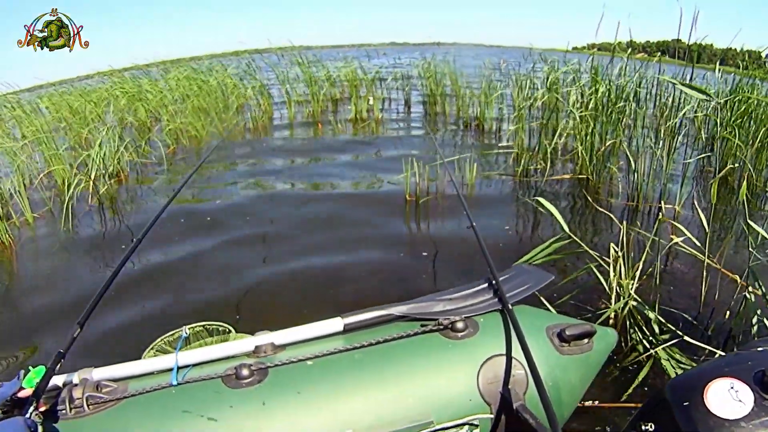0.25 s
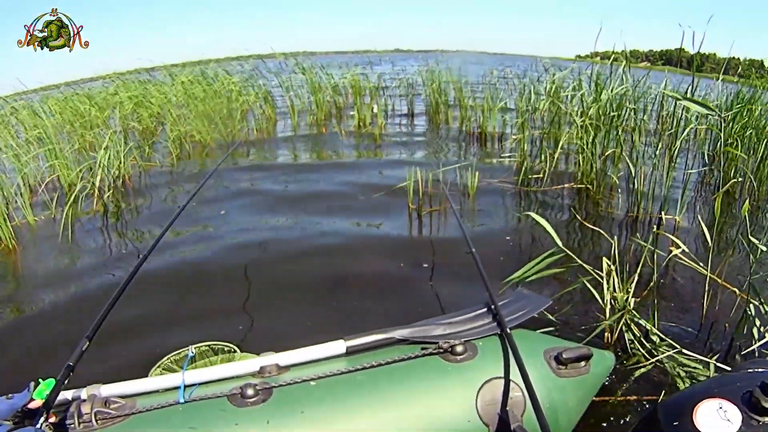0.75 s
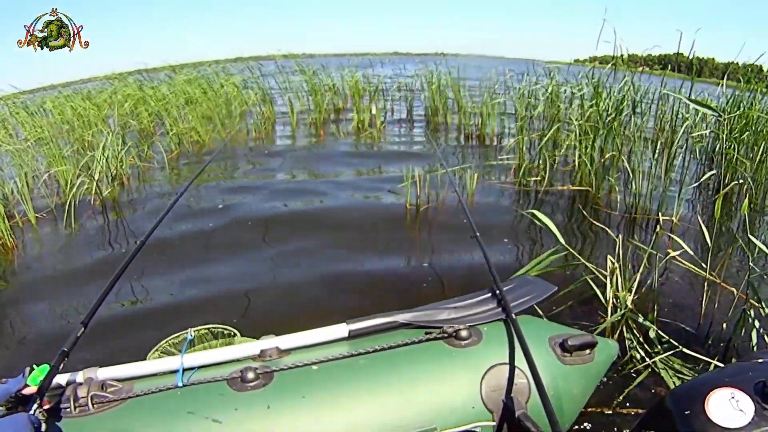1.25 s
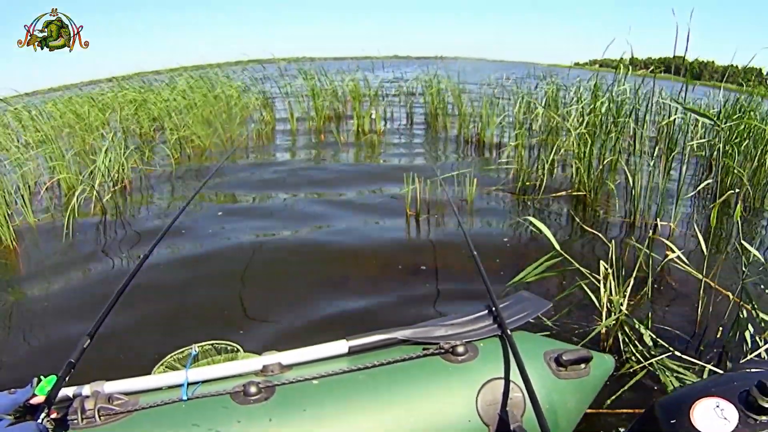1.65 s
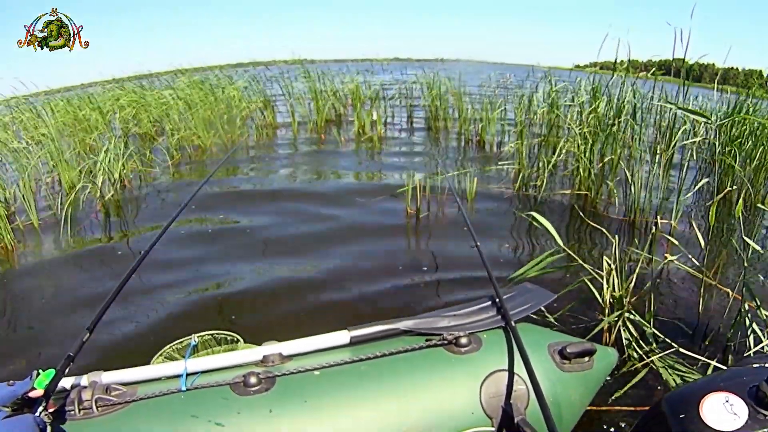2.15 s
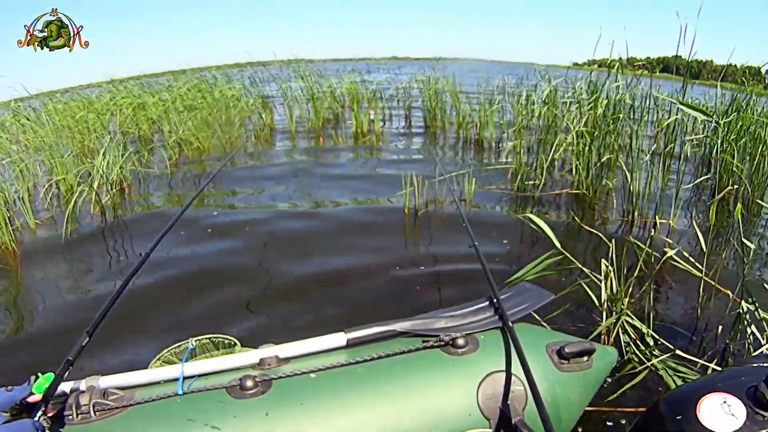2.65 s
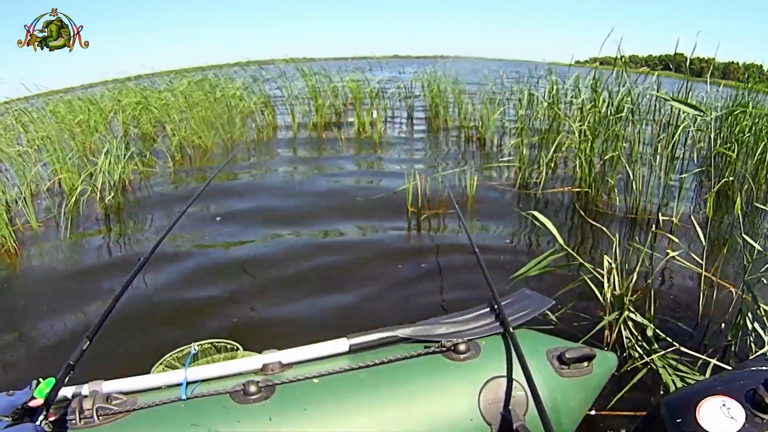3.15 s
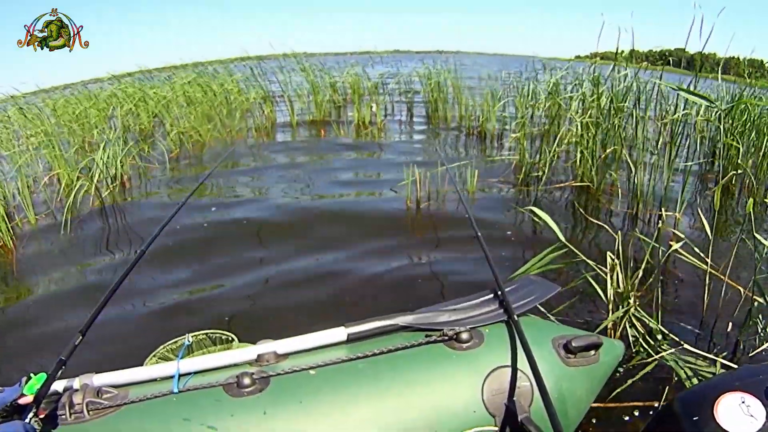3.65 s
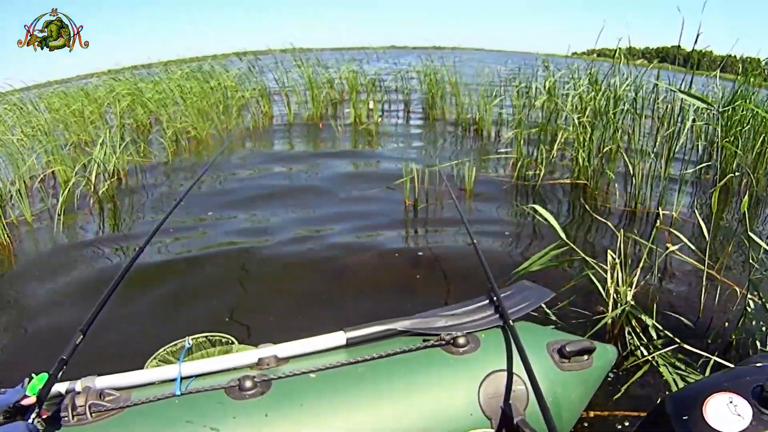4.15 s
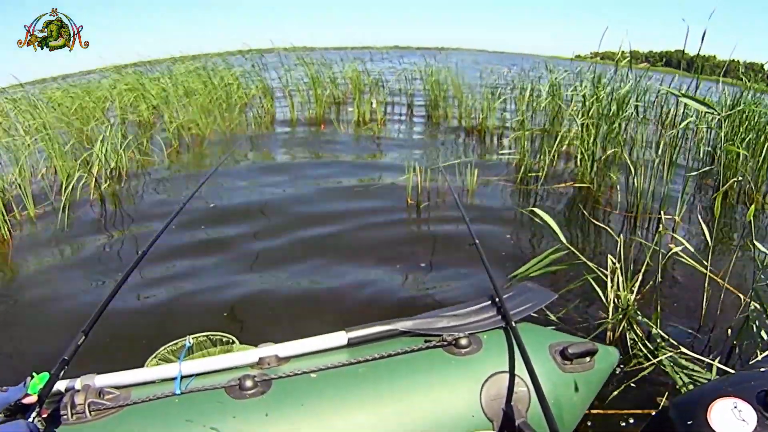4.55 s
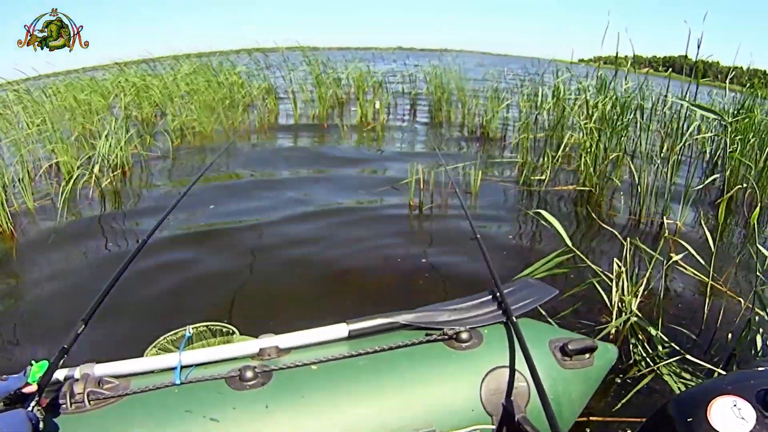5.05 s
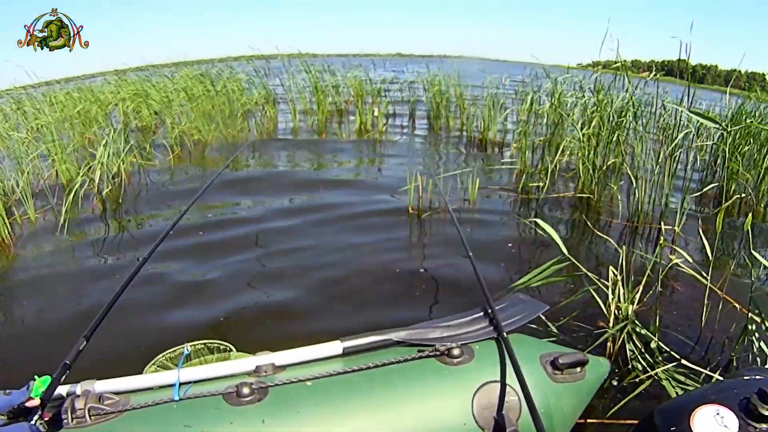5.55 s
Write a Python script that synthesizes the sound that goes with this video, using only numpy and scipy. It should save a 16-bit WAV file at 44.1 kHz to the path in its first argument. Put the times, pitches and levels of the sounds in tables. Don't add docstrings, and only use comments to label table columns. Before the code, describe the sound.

Close songbird in lakeside reeds: sparse chips, then rapid grating croaks and rattles broken by quick squeaky pipes, above quiet water and leaf hiss.

```python
import sys
import numpy as np
from scipy import signal
from scipy.fft import rfft, irfft, next_fast_len
from scipy.io import wavfile

SR = 44100
rng = np.random.default_rng(int(sys.argv[2]) if len(sys.argv) > 2 else 0)


def gain_from_decibels(decibels):
    exponent = np.asarray(decibels, float) / 20
    return 10 ** exponent


def transcribe(signal):
    frames = np.atleast_2d(signal).T
    limited = np.clip(frames, -1, 1)
    pcm = np.round(limited * 32767).astype(np.int16)
    wavfile.write(sys.argv[1], SR, pcm)


N = 255735
TIME = np.arange(N) / SR
SIZE = next_fast_len(N + SR)
FREQS = np.maximum(np.arange(SIZE // 2 + 1) * SR / SIZE, 1)
CUTOFF_HZ = 11120


def rms_one(x):
    return x / np.sqrt(np.mean(x ** 2) + 1e-20)


def over_hz(rows):
    hz, *columns = np.transpose(rows)
    return [np.interp(np.log(FREQS), np.log(hz), column) for column in columns]


def through(x, response):
    return irfft(rfft(x, SIZE) * response, SIZE)[..., :N]


def bell(at_s, spread_s):
    first = max(int((at_s - 4 * spread_s) * SR), 0)
    last = min(int((at_s + 4 * spread_s) * SR), N)
    span = slice(first, last)
    return span, np.exp(-.5 * ((TIME[span] - at_s) / spread_s) ** 2)


def band_noise(hz, octaves, count):
    edges_hz = np.clip([hz * 2 ** -octaves, hz * 2 ** octaves], 20, .45 * SR)
    sos = signal.butter(2, edges_hz, "band", fs=SR, output="sos")
    return rms_one(signal.sosfilt(sos, rng.standard_normal(count)))


def lake(flicker_db=0.4):
    # frequency [Hz], level [dB per Hz].
    hiss = [(40, -92.5), (100, -92.5), (400, -88.5), (800, -89.5), (1400, -88.5), (1900, -92),
            (2400, -84.5), (2900, -85.5), (3400, -90), (4200, -92.5), (5500, -93.5), (7500, -97.5),
            (9200, -101.0), (10000, -99.5), (11000, -100.5)]
    # time [s], hiss gain [dB].
    breeze = [(0, 0.5), (2, 0.5), (4, 1.5), (5.8, 1.5)]
    # frequency [Hz], lag [rad], likeness [0-1], level [dB].
    hiss_ports = [(60, 0, .88, 0), (150, .3, .68, 0), (260, 1.6, .15, 0), (450, 3.0, .5, 0),
                  (1400, 3.0, .6, 0), (2000, 2.6, .45, 0), (2400, 1.7, .75, -1.5), (2750, 2.5, .4, -3),
                  (3050, 1.5, .15, -3), (3500, 1.1, .38, -1), (4200, .9, .2, -1), (5200, .2, .65, -1),
                  (6000, .2, .35, -.5), (8500, 0, .72, 0), (11000, 0, .85, 0)]

    lag_rad, alike, port_db = over_hz(hiss_ports)
    alike = np.clip(alike, 0, 1)
    white = rfft(rng.standard_normal((2, N)), SIZE)
    left, other = white * gain_from_decibels(over_hz(hiss)[0]) * np.sqrt(SR / 2)
    shared = alike * np.exp(-1j * lag_rad) * left
    right = gain_from_decibels(port_db) * (shared + np.sqrt(1 - alike ** 2) * other)
    gusts_db = np.interp(TIME, *np.transpose(breeze)) + flicker_db * band_noise(29.0, 1, N)
    return irfft(np.array([left, right]), SIZE)[:, :N] * gain_from_decibels(gusts_db)


def hull_and_motor(wander_hz=1.5):
    # frequency [Hz], level [dB rms].
    hum = [(131.5, -71.5), (263, -83.5)]
    # time [s], peak [dB], pitch [Hz].
    laps = [
        (1.322, -60, 112),
        (2.22, -56.5, 115),
        (5.56, -62.5, 80),
    ]

    out = np.zeros(N)
    drift = np.cumsum(band_noise(19, 0.96, N)) * wander_hz / SR
    for hz, db in hum:
        out += np.sqrt(2) * gain_from_decibels(db) * np.sin(2 * np.pi * (hz * TIME + drift))
    for s, db, hz in laps:
        span, swell = bell(s, 0.024)
        out[span] += gain_from_decibels(db) * swell * np.sin(2 * np.pi * hz * TIME[span])
    return out


def ticks(spread_s=0.0024, under_db=-7.0):
    # start [s], peak [dB], centre [Hz].
    contacts = [
        (0.014, -44, 4840),
        (0.053, -50, 6520),
        (0.4178, -39, 4930),
        (0.5425, -42, 4670),
        (0.7044, -47, 4800),
        (1.2538, -40, 4300),
        (1.3912, -40.5, 4650),
        (1.573, -47, 5450),
        (1.5984, -42.5, 5570),
    ]

    out = np.zeros(N)
    for s, db, hz in contacts:
        span, swell = bell(s + spread_s, spread_s)
        out[span] += gain_from_decibels(db + under_db) * swell * band_noise(1.11 * hz, 0.6, len(swell))
    return out


def rasps():
    # start [s], length [s], level [dB], centre [Hz].
    breaths = [
        (1.071, .045, -40, 2230),
        (1.085, 0.041, -55.5, 1430),
        (1.564, 0.046, -53, 4480),
        (2.983, 0.04, -47, 4570),
        (4.252, 0.07, -40.5, 4020),
        (4.329, 0.013, -35, 3730),
        (4.509, 0.053, -45.5, 4500),
        (4.518, 0.033, -45, 2920),
        (4.6, 0.013, -32.5, 3530),
        (5.728, 0.09, -44, 4400),
    ]

    out = np.zeros(N)
    for s, length_s, db, hz in breaths:
        span, swell = bell(s + length_s / 2, length_s / 3)
        octaves = np.clip(6 * length_s, .1, .35)
        out[span] += gain_from_decibels(db) * swell * band_noise(hz, octaves, len(swell))
    return out


def pipes(fade_s=0.0042):
    # start [s], length [s], pitch [Hz], peak [dB], mouth resonance [Hz].
    whistles = [(1.614, 0.05, 1372, -39.5, 4350), (2.955, 0.041, 1410, -48, 2840),
                (2.999, 0.072, 1300, -25, 3730), (3.081, 0.017, 1280, -40, 4430),
                (4.261, 0.021, 1480, -37.5, 4560), (4.298, 0.04, 1865, -21, 3520),
                (4.364, 0.061, 1418, -32.5, 4440), (4.527, 0.032, 1180, -36, 4700),
                (4.554, .052, 1786, -24, 3500), (4.629, 0.055, 1389, -31, 4310),
                (5.719, 0.042, 1275, -38.5, 2500), (5.766, 0.044, 1334, -37.5, 4800)]
    motion = [(0.015, 0.0063, 0.66), (.012, 0.014, 0.9), (0.009, -0.008, 0.56), (0.0054, -0.015, 0.2),
              (0.018, -0.033, 0.7), (0.0061, -.01, 1), (0.01, 0.0154, 0.62), (0.025, -0.045, 0.6),
              (0.01, 0.011, 0.57), (0.014, 0.012, 0.38), (.016, -0.107, 0.98), (0.0067, 0.025, 0.9)]
    # frequency [Hz], level against the strong ones [dB].
    weak_partials = [(1300, -33), (1400, -27), (1900, -31), (6500, -26), (7100, -20), (8000, -32),
                     (9200, -42), (10000, -18), (11000, -18)]
    mouth_db_per_octave, flutter_db = 41, 2.2
    throat_hz, throat_under_db = 2550, 5
    swell_db_per_s, swell_pitch_power = 139, 2.7
    hold_s = 0.0076

    out = np.zeros(N)
    weak_hz, weak_db = np.transpose(weak_partials)
    for (s, length_s, hz, peak_db, mouth_hz), (waver, glide, peak_share) in zip(whistles, motion):
        span = slice(int((s - fade_s) * SR), min(int((s + length_s + fade_s) * SR), N))
        t = TIME[span]
        tremor = 1 + waver * band_noise(114, 1.36, N // 8)[-len(t):]
        pitch_hz = hz * (1 + glide * ((t - s) / length_s - .5)) * tremor
        phase = 2 * np.pi * np.cumsum(pitch_hz) / SR
        off_peak_s = np.maximum(np.abs(t - s - peak_share * length_s) - hold_s, 0)
        top_db = peak_db - swell_db_per_s * (hz / 1400) ** swell_pitch_power * off_peak_s

        away_db = {}
        for k in (2, 3, 4):
            mouth_db = mouth_db_per_octave * abs(np.log2(k * hz / mouth_hz))
            throat_db = mouth_db_per_octave * abs(np.log2(k * hz / throat_hz)) + throat_under_db
            away_db[k] = min(mouth_db, throat_db)
        least_db = min(away_db.values())
        partials_db = {}
        for k, loss_db in away_db.items():
            flutter = np.clip(band_noise(20, 0.47, N // 8)[-len(t):], -2, 1)
            partials_db[k] = top_db - loss_db + least_db + flutter_db * flutter
        shrill_db = (top_db + partials_db[4]) / 2
        partials_db[1] = top_db + np.interp(hz, weak_hz, weak_db)
        for k in range(5, 9):
            partials_db[k] = shrill_db + np.interp(k * hz, weak_hz, weak_db)

        edge = np.clip(np.minimum(t - t[0], t[-1] - t) / fade_s, 0, 1)
        for k, db in partials_db.items():
            if k * hz < CUTOFF_HZ:
                out[span] += edge * gain_from_decibels(db) * np.sin(k * phase)
    return out


def throbs():
    chips = [
        (.186, .011, -28, 2472),
        (.489, .013, -23, 2380),
        (1.016, .001, -34, 2500),
        (1.030, .012, -34, 2399),
        (1.061, .030, -27, 2478),
        (1.098, .028, -28.5, 2348),
        (1.253, .001, -26, 2426),
        (1.262, .008, -16, 2604),
        (1.385, .001, -28.5, 2500),
        (1.394, 0.011, -21, 2678),
    ]
    croaks = [(1.876, 0.013, -31, 2440), (1.906, 0.015, -14.5, 2430), (1.935, 0.029, -11.5, 2460),
              (1.995, .022, -24, 2520), (2.121, .014, -23, 2330), (2.151, 0.023, -14, 2380),
              (2.183, 0.033, -12.5, 2450), (2.239, 0.03, -18, 2590), (2.438, 0.015, -26.5, 2350),
              (2.469, 0.018, -15, 2390), (2.499, 0.034, -11.5, 2510), (2.557, 0.028, -19, 2585),
              (2.674, 0.02, -25, 2350), (2.711, .021, -13.5, 2440), (2.742, 0.033, -11, 2470),
              (2.809, 0.016, -21.5, 2583)]
    rattles = [(3.262, 0.01, -21, 2600), (3.288, 0.0045, -16, 2615), (3.308, 0.042, -13.5, 2540),
               (3.355, 0.022, -11, 2520), (3.481, 0.011, -23, 2570), (3.510, .012, -14.5, 2620),
               (3.530, 0.029, -11.5, 2575), (3.568, 0.01175, -13, 2520), (3.588, 0.011, -11, 2483),
               (3.768, 0.0056, -29, 2570), (3.794, 0.041, -20.5, 2630), (3.840, .027, -13, 2620),
               (3.878, 0.0429, -12.5, 2520), (3.976, 0.011, -30.5, 2670), (4.010, 0.025, -18.5, 2690),
               (4.051, 0.02, -13.5, 2650), (4.072, .014, -10.5, 2600), (4.094, 0.032, -12, 2540)]
    chacks = [(4.821, 0.0078, -31, 2700), (4.842, 0.0064, -19.5, 2600), (4.857, 0.048, -12.5, 2610),
              (4.975, .013, -29, 2600), (5.003, .001, -18.5, 2620), (5.017, 0.046, -11.5, 2700),
              (5.282, 0.00098, -36, 2500), (5.294, 0.0048, -20, 2540), (5.311, .016, -13.5, 2560),
              (5.335, 0.0068, -10.5, 2540), (5.350, 0.00077, -17, 2490), (5.450, .001, -31, 2670),
              (5.464, 0.0041, -17.5, 2590), (5.478, 0.016, -11, 2610), (5.501, 0.0139, -11, 2568),
              (5.527, .001, -21.5, 2585)]
    gap_s, slip_share = .0062, 0.27
    rise_db, fall_db, full_s = 3.5, 8, .022
    pitch_scatter_hz = 57.04

    bursts = list(chips) + list(croaks) + list(rattles) + list(chacks)
    rows = []
    for s, length_s, db, hz in bursts:
        count = min(int(round(length_s / gap_s)) + 1, 12)
        place = np.linspace(0, 1, count)
        slip, higher = np.clip(rng.standard_normal((2, count)), -2, 2)
        edge_db = np.where(place < .5, rise_db, fall_db) * (2 * place - 1) ** 2 * min(length_s / full_s, 1)
        at_s = s + length_s * place + slip_share * gap_s * slip * (place > 0)
        rows += zip(at_s, db - edge_db, hz + pitch_scatter_hz * higher)
    return np.transpose(sorted(rows))


def chatter(breath_db=7.0, burst_db=-3.0, share_of_gap=0.52, longest_s=.0039):
    # frequency [Hz], level beak half shut [dB per Hz], level beak open [dB per Hz].
    throat = [(910, -57, -64), (1240, -35.5, -35), (1720, -32, -39.5), (1860, -38, -38),
              (2061.5, -16.5, -27), (2500, -3, -3.5), (3150, -26.5, -22), (4120, -36.5, -27),
              (4550, -47, -40.5), (7400, -51.5, -49.5), (11900, -58, -55.5)]
    beak_turns_s = (1.2, 1.6, 1.99, 2.06, 2.23, 2.3, 2.55, 2.62, 2.79)
    murmur_db, tone_db = -11, -1.5

    s, db, hz = throbs()
    gaps_s = np.diff(s)
    mean_gaps_s = (np.append(gaps_s, 1) + np.append(1, gaps_s)) / 2
    widths_s = np.clip(share_of_gap * mean_gaps_s, .001, longest_s)
    beat, puffs = np.zeros(N), np.zeros(N)
    for k in range(len(s)):
        span, swell = bell(s[k], widths_s[k] / 1.08)
        beat[span] += gain_from_decibels(db[k]) * swell * (-1) ** k
        span, swell = bell(s[k] + .005, .008)
        puffs[span] += gain_from_decibels(db[k] + murmur_db) * swell
        span, swell = bell(s[k] - widths_s[k] / 2, .001)
        puffs[span] += gain_from_decibels(db[k] + burst_db) * swell
    tone = gain_from_decibels(tone_db) * beat * np.sin(2 * np.pi * np.cumsum(np.interp(TIME, s, hz)) / SR)
    breath = rng.standard_normal(N) * (np.abs(beat) + puffs)
    beak_open = np.searchsorted(beak_turns_s, TIME) % 2
    by_beak = np.array([breath * (1 - beak_open), breath * beak_open])
    shaped = through(by_beak, gain_from_decibels(np.array(over_hz(throat))))
    return tone + gain_from_decibels(breath_db) * shaped.sum(axis=0)


def reeds(song):
    # delay [s], level [dB].
    echoes = [(.045, -21)]
    t60_s, wash_db = .34, -18
    tilt_db_per_octave = 8

    t = TIME[:SR // 2]
    shared, own = rng.standard_normal((2, len(t)))
    scatter = np.array([shared, np.sqrt(1 - .99 ** 2) * shared + own])
    wash = scatter * gain_from_decibels(-60 * t / t60_s) * (t > .012)
    answer = rms_one(wash) * gain_from_decibels(wash_db) / np.sqrt(len(t))
    for delay_s, db in echoes:
        answer[:, int(delay_s * SR)] += gain_from_decibels(db)
    tilt = gain_from_decibels(tilt_db_per_octave * np.log2(np.clip(FREQS, 1000, 5000) / 2500))
    return through(song, 1 + tilt * rfft(answer, SIZE))


def scene():
    # frequency [Hz], lag [rad], level [dB].
    bird_ports = [(300, 2, 0), (890, 2, 1), (1400, 1.4, 0.5), (1800, 2.44, 5.5), (1990, 1.73, -4),
                  (2360, 1.45, -2.5), (2580, 2.25, -1), (2730, 2.35, -5), (2870, 1.3, -9), (3440, 1.32, 2),
                  (3686, 3.2, -5), (4200, 4.37, -9), (4500, 5.7, -8.5), (5200, 7.2, 0.5), (6050, 5.4, -5),
                  (8100, 6.3, 0.5)]

    left, right = reeds(chatter() + pipes() + rasps())
    lag_rad, db = over_hz(bird_ports)
    bird = np.array([left, through(right, gain_from_decibels(db) * np.exp(-1j * lag_rad))])
    return bird + lake() + ticks() + hull_and_motor()


def roll_off(x):
    return signal.sosfilt(signal.butter(12, 12330, fs=SR, output="sos"), x)


def record(dry):
    leak_db = -36
    mix = through(dry, np.where(FREQS < CUTOFF_HZ, 1, gain_from_decibels(leak_db)))
    return roll_off(mix)


dry = scene()
out = record(dry)
transcribe(out)
```